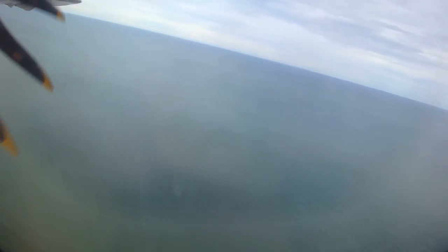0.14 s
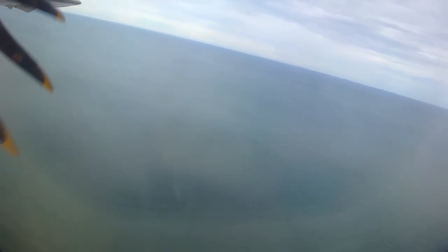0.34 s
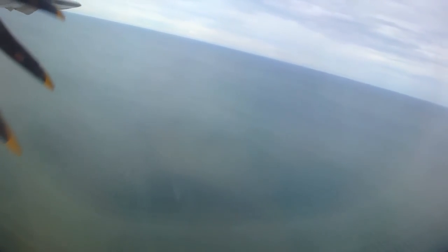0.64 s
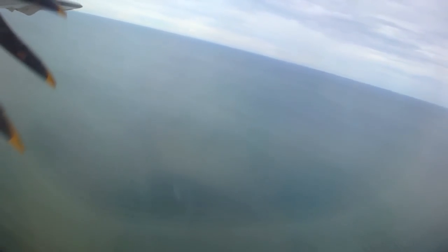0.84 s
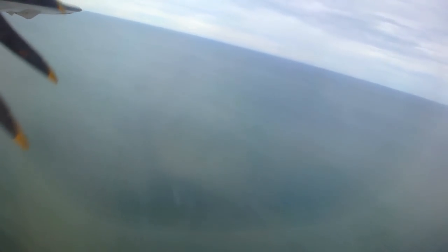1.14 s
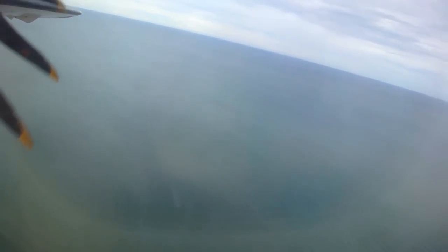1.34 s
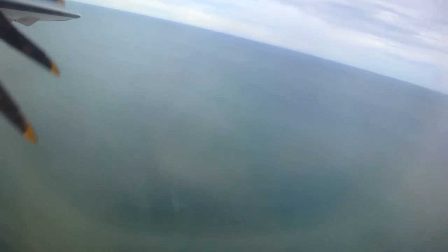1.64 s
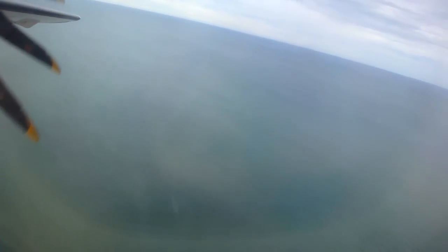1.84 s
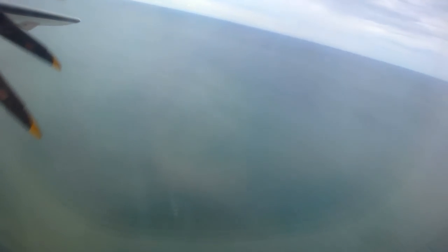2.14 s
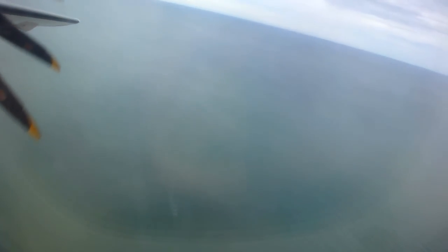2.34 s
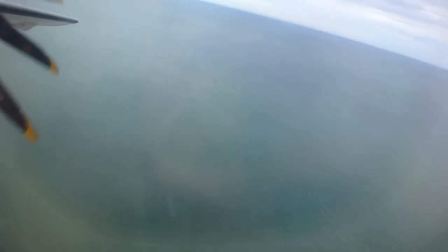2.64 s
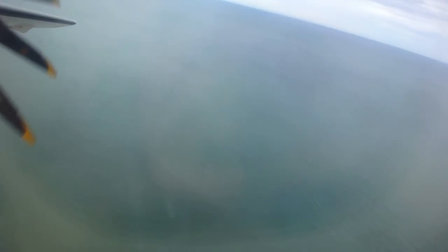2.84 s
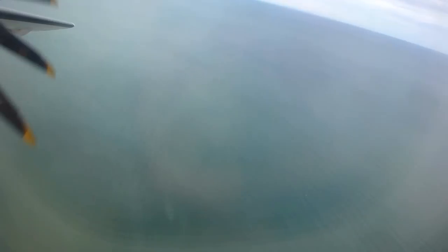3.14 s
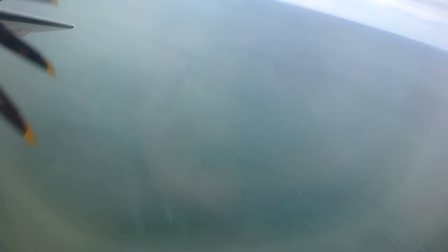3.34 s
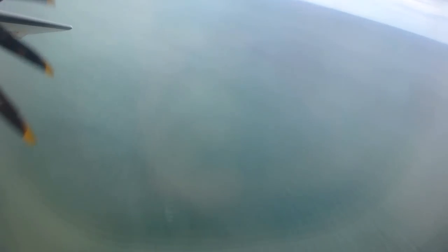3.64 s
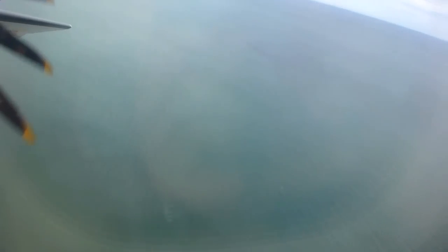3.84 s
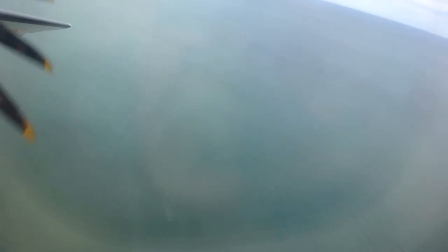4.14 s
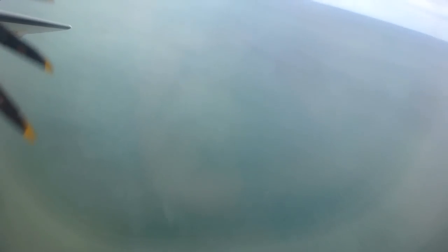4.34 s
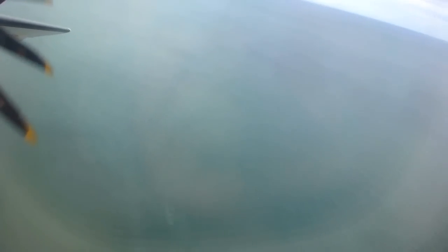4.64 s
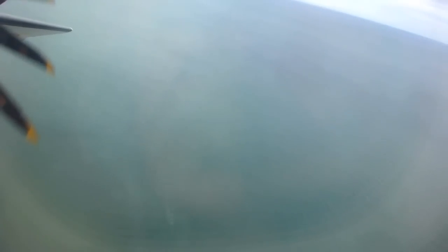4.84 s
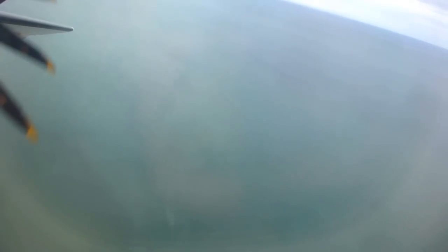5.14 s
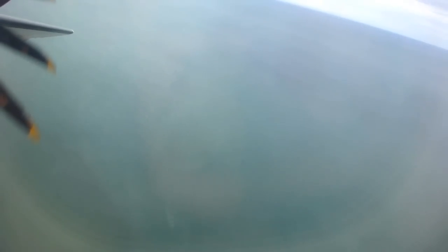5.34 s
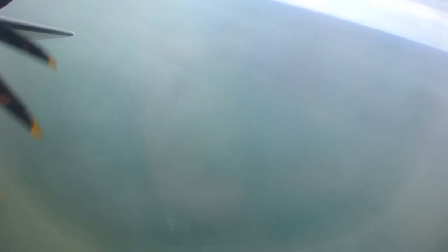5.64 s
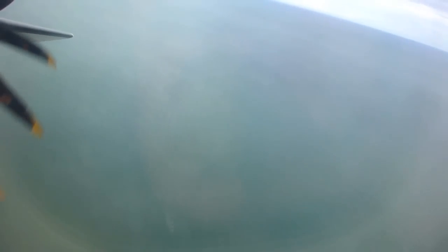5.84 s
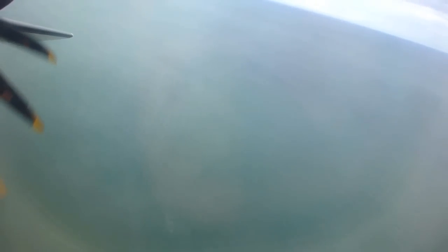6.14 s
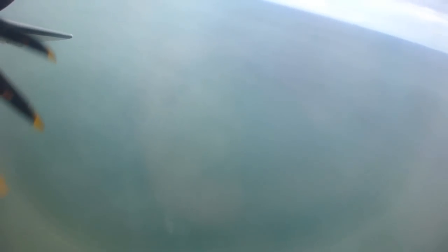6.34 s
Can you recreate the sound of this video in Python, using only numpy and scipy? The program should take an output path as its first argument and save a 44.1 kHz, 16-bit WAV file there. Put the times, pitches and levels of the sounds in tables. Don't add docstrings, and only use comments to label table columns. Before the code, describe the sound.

Continuous turboprop cabin noise, already at full level and never stopping. Two low, nearly pure engine tones an octave apart dominate, swelling slightly, over lumpy rushing air against the hull. A weak, rough, high whine repeatedly dips and returns, and a trim panel rattles lightly with the blade beats. The tone shifts subtly near the middle, then settles. Close, enclosed, heard by a small camera by the window.

```python
import sys
import numpy as np
from scipy import signal
from scipy.fft import rfft, irfft
from scipy.io import wavfile
from scipy.ndimage import uniform_filter1d, minimum_filter1d

SR = 44100
rng = np.random.default_rng(int(sys.argv[2]) if len(sys.argv) > 2 else 0)


def linear_from_db(decibels):
    return 10 ** (np.asarray(decibels, float) / 20)


def int16_out(signal):
    q = np.round(np.clip(np.atleast_2d(signal).T, -1, 1) * 32767)
    wavfile.write(sys.argv[1], SR, q.astype(np.int16))


N = 285768
TIME = np.arange(N) / SR

# (frequency [Hz], density [dB per Hz])
HULL_ROAR = [(20, -36), (45, -28), (62, -16), (100, -8), (130, -2.5), (230, 1.5), (310, 1), (340, -0.5),
             (410, -2.5), (480, -6), (560, -11.5), (640, -14), (900, -12.5), (1100, -19)]
# (frequency [Hz], density [dB per Hz])
WINDOW_HISS = [(1100, -18), (1400, -19.5), (1900, -22.5), (2350, -22), (2550, -25), (3200, -27.5),
               (3550, -30), (4000, -30), (5000, -35.5), (6000, -34), (7600, -41.5), (10000, -39.5),
               (10300, -41.5), (11000, -44.5)]
# (frequency [Hz], width [Hz], lift [dB])
CABIN_MODES = [
    (321.6, 8.5, -5.5),
    (335, 14, 4.5),
    (740, 30, 1),
    (1170, 90, 1.5),
    (413, 32, 3),
    (591, 21, 3.5),
    (880, 140, 1.5),
    (2950, 20, -1),
]
# (time [s], depth [dB], length [s])
SLACK_MOMENTS = [(0, 5.5, 0.063), (.25, 0.5, .07), (0.507, 4, 0.051), (.72, 3.5, .1), (1.058, 3.5, 0.054),
                 (1.3, 3, .07), (1.61, 4.5, 0.048), (1.82, 2, 0.083), (2.0, 2.5, 0.057), (2.22, 4, 0.046),
                 (2.55, 4, .07), (2.838, 5.5, .1), (2.97, 2, .05), (3.244, 3.5, 0.079), (3.5, 5, .07),
                 (3.72, 2.5, 0.083), (3.95, 3, .12), (4.19, 3, .07), (4.4, 2, 0.051), (4.55, 3, 0.046),
                 (4.68, 3.5, 0.044), (4.95, 1, .12), (5.3, 2.5, 0.23), (5.75, 1.5, .15), (6.15, 2.5, .25)]
SIDEBAND_LEVELS = [-17, -15, -11, -16, -9.5, -4.5, -5, -7, -40, -8, -12, -12, -22]
UPPER_COMB_LEVELS = [-87.5, -87.5, -81, -89, -85.5, -93.5, -82.5, -89, -81, -87.5, -81.5, -85.5, -94.5,
                     -89.5, -95, -85, -90.5, -95.5]
# (time [s], rate [Hz])
BLADE_RATE = [(0, 120.02), (.35, 119.84), (.65, 120.07), (1.2, 120.17), (1.85, 120.2), (2.1, 120.07),
              (2.45, 119.78), (2.75, 119.72), (3.1, 119.98), (4.2, 119.96), (4.55, 119.8), (4.9, 119.95),
              (5.5, 120.03), (6.48, 120.03)]
# (time [s], level of the blade rate [dB])
BLADE_WAKE = [(0, -24.5), (.06, -24), (.4, -23.3), (.8, -24), (1.55, -23.5), (1.9, -23.5), (2.09, -22),
              (2.3, -23.8), (2.55, -25), (2.97, -25), (3.4, -23.5), (3.75, -23.5), (4.5, -23), (5.0, -23),
              (5.6, -24), (6.05, -24), (6.28, -23), (6.48, -23.5)]
# (time [s], shift of the second multiple [turns])
PROPELLER_SLIDE = [
    (0, -.13),
    (1.5, -.18),
    (2.3, -.17),
    (2.6, -.05),
    (2.9, -.03),
    (3.3, -.17),
    (4.6, -.21),
    (6.48, -.18),
]
# (start level [dB], drift [dB/s], change at full slide [dB], wavering [0-1])
MIDDLE_MULTIPLES = [
    (-44.5, -0.96, -6, 0.8),
    (-44, -1.37, 2.5, 0.23),
    (-50.5, -0.65, -12.5, .3),
    (-62, 1.0, 8, .4),
]
WEAK_MULTIPLES = [6, 8, 9, 10, 13, 16, 17, 18, 19]
WEAK_LEVELS = [-60.5, -62, -62, -68.5, -70, -74.5, -67.5, -67.5, -70]


def evened(x):
    return x / np.sqrt(np.mean(abs(x) ** 2) + 1e-20)


def curves(rows):
    times, *columns = np.transpose(rows)
    return [np.interp(TIME, times, column) for column in columns]


def wander(hz):
    count, rate = 4096, 500
    f = np.fft.rfftfreq(count, 1 / rate)
    spectrum = rfft(rng.standard_normal(count)) * np.exp(-(f / hz) ** 2) * (f > 0)
    return np.interp(TIME, np.arange(count) / rate, evened(irfft(spectrum)))


def tone(turns, fuzz, hz):
    wavering = 1 + fuzz * (wander(hz) + 1j * wander(hz)) / np.sqrt(2)
    return np.sqrt(2 / (1 + fuzz ** 2)) * (np.exp(2j * np.pi * turns) * wavering).real


def resonate(x, hz, width):
    b, a = signal.iirpeak(hz, hz / width, SR)
    return signal.lfilter(b, a, signal.lfilter(b, a, x))


def comb(mesh, turns, levels_db, count, fuzz, hz):
    lines = 0
    for k, db in enumerate(levels_db):
        phase = mesh + (count + k) * turns + rng.random()
        lines = lines + linear_from_db(db) * tone(phase, fuzz, hz)
    return lines


def wake_db():
    return curves(BLADE_WAKE)[0] + 23.5


def slack_db():
    return -sum(depth_db * np.exp(-((TIME - s) / length) ** 2) for s, depth_db, length in SLACK_MOMENTS)


def airflow(turns):
    frames, hz = N // 1024 + 6, np.fft.rfftfreq(4096, 1 / SR)
    real, imaginary, patches = rng.standard_normal((frames, len(hz), 3)).T
    patches = uniform_filter1d(patches, size=12, axis=0)
    patches = evened(uniform_filter1d(patches, size=4, axis=1))

    f, db = np.transpose(HULL_ROAR + WINDOW_HISS[1:])
    colour_db = np.interp(np.log(hz + 1), np.log(f + 1), db)
    for mode_hz, width, lift_db in CABIN_MODES:
        colour_db += lift_db * np.exp(-((hz - mode_hz) / width) ** 2)
    patchy_db = 0.84 + 0.61 / (1 + (hz / 600) ** 2)
    z = (real + 1j * imaginary) * linear_from_db(colour_db[:, None] + patchy_db[:, None] * patches)
    noise = evened(signal.istft(z, nperseg=4096, noverlap=3072)[1][:N])

    top = resonate(noise, hz=8800, width=3000)
    puff = .3 * np.exp(4 * (np.cos(2 * np.pi * (turns - .44)) - 1))
    level_db = -34.5 + 0.63 * wake_db() + 0.34 * wander(hz=2.8)
    return linear_from_db(level_db) * (noise + puff * top)


def gearbox(turns):
    mesh = np.cumsum(6949 + 2.5 * wander(hz=4)) / SR
    whine_db = -56.5 + slack_db()
    load_db = whine_db - whine_db.mean()

    main = evened(comb(mesh, turns, SIDEBAND_LEVELS, count=-8, fuzz=1.0, hz=5.7))
    main *= linear_from_db(whine_db - 5.0 + 0.58 * load_db)
    upper = comb(mesh, turns, UPPER_COMB_LEVELS, count=6, fuzz=0.57, hz=4)

    gate = 1 + .12 * np.cos(2 * np.pi * (turns - .25)) + .1 * np.cos(6 * np.pi * (turns - .2))
    chatter = evened(resonate(rng.standard_normal(N) * gate, hz=6700, width=1100))
    chatter *= linear_from_db(whine_db - 2.5 - 0.49 * load_db)

    centre = linear_from_db(-61.5 + 1.8 * slack_db()) * tone(mesh, fuzz=.2, hz=8)
    pump_turns = np.cumsum(2383 + 3 * wander(hz=1.5)) / SR
    pump = linear_from_db(-68) * tone(pump_turns, fuzz=.5, hz=2.1)
    return centre + main + chatter + upper + pump


def trim_panel(turns):
    beats = np.flatnonzero(np.diff(np.floor(turns - .62)))
    late, size_db = np.clip(rng.standard_normal((len(beats), 2)), -2, 2).T
    offsets = np.round(.00035 * SR * late).astype(int)
    knocks = np.zeros(N)
    knocks[np.clip(beats + offsets, 0, N - 1)] = linear_from_db(1.4 * size_db)

    ring = resonate(knocks, hz=4310, width=600) - .8 * resonate(knocks, hz=4530, width=450)
    body = resonate(knocks, hz=3400, width=730)
    level_db = -63.5 + 1.1 * wake_db() + wander(hz=1.8)
    return linear_from_db(level_db) * (evened(ring) + linear_from_db(-5.0) * evened(body))


def propellers(turns):
    slide = curves(PROPELLER_SLIDE)[0]
    slip = np.clip((slide + .17) / .14, 0, 1)

    first_db = curves(BLADE_WAKE)[0] + .3 * wander(hz=7.2)
    second_db = -26 + 1.02 * wake_db() - 2 * slip + .55 * wander(hz=7.2)
    out = linear_from_db(first_db) * np.sqrt(2) * np.cos(2 * np.pi * turns)
    out += linear_from_db(second_db) * np.sqrt(2) * np.cos(2 * np.pi * (2 * turns + slide))

    for k, (db, drift_db, slip_db, fuzz) in zip([3, 4, 5, 7], MIDDLE_MULTIPLES):
        level_db = db + wake_db() + drift_db * TIME + slip_db * slip
        out += linear_from_db(level_db) * tone(k * turns, fuzz, hz=4.4)
    for k, db in zip(WEAK_MULTIPLES, WEAK_LEVELS):
        out += linear_from_db(db) * tone(k * turns + rng.random(), fuzz=1.3, hz=0.24 * k)
    return out


def scene():
    turns = .39 + np.cumsum(curves(BLADE_RATE)[0]) / SR
    return (airflow(turns) + gearbox(turns) + trim_panel(turns) + propellers(turns))[None]


def masked(x):
    hz, _, z = signal.stft(x, SR, nperseg=2048, noverlap=1536)
    power = uniform_filter1d(abs(z) ** 2, size=3, axis=0)
    power_db = 10 * np.log10(uniform_filter1d(power, size=8, axis=1) + 1e-20)
    loudest_db = -minimum_filter1d(-power_db, size=51, axis=0)
    dropped = (power_db < loudest_db - 18) & (hz[:, None] > 5700) & (hz[:, None] < 8000)
    return signal.istft(z * np.where(dropped, .2, 1), SR, nperseg=2048, noverlap=1536)[1][:N]


def low_pass(x):
    return signal.sosfilt(signal.butter(12, 11050, fs=SR, output="sos"), x)


def record(dry):
    edge = signal.firwin(2047, 11010, window=("kaiser", 3), fs=SR)
    mix = signal.oaconvolve(masked(dry[0]), edge, "same")[None]
    return low_pass(mix)


dry = scene()
out = record(dry)
int16_out(out)
```